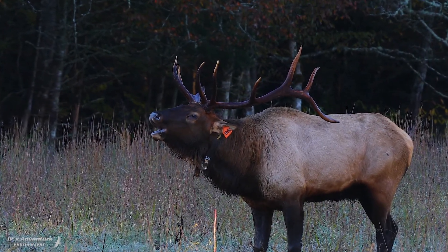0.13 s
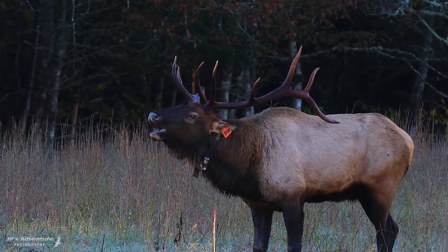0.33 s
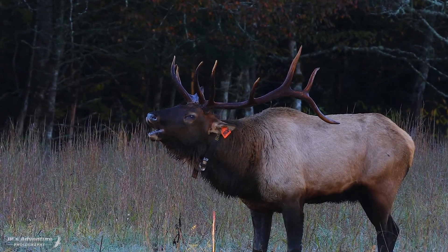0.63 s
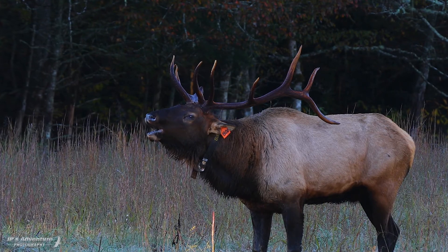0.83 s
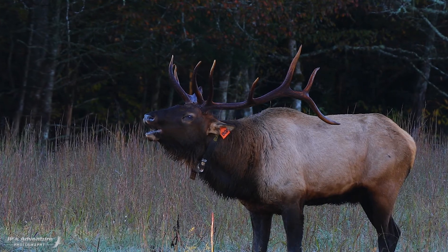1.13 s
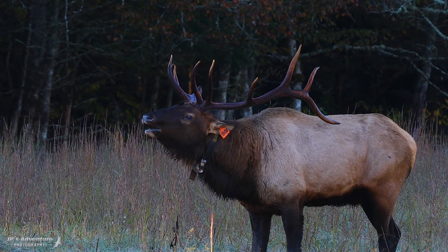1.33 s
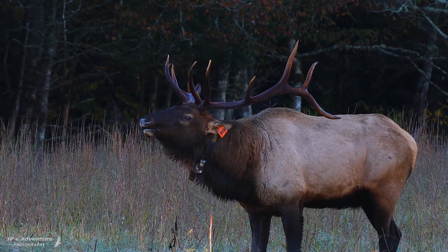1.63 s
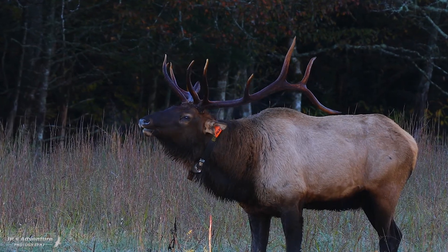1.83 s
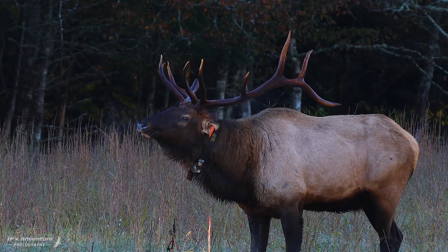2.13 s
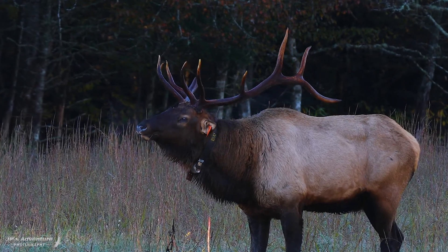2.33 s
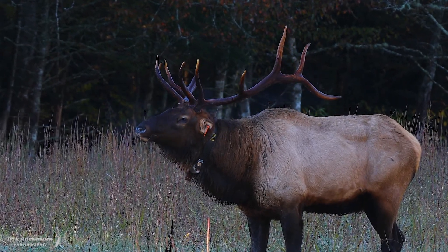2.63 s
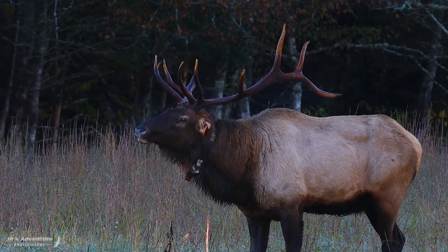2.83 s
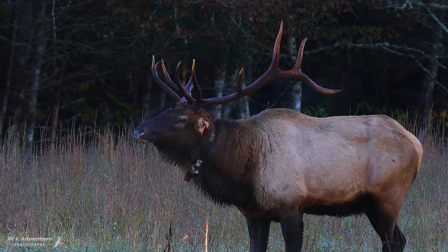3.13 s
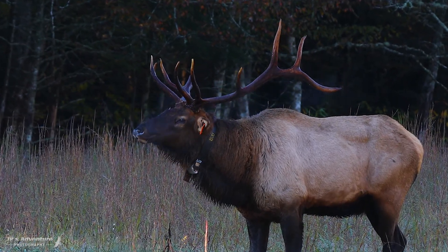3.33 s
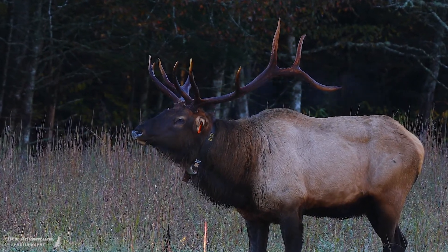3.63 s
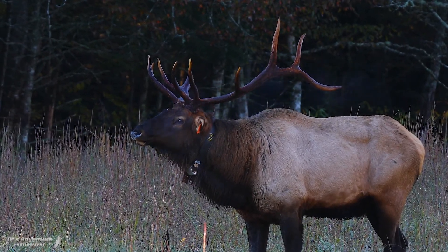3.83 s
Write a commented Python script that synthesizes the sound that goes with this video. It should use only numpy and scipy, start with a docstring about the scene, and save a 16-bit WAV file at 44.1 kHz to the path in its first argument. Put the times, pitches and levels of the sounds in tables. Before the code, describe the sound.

A bull elk's high whistling bugle holds, slides down raspily, and echoes across a meadow.

```python
"""A bull elk's high whistle, already under way, is held over a meadow, then slides down in steps.
A low, rough voice of pulses and rasp sounds with it and chops it into sidebands, deepest in the slide.
The forest edge and far slopes answer with delayed copies and long, dull reverberation.
One microphone also hears a faint, steady rush of filtered noise for outdoor air, and once, far away,
the short trill of a small bird: a thin tone with a fast swing in pitch."""
import sys
import numpy as np
from scipy import signal
from scipy.fft import rfft, irfft, next_fast_len
from scipy.io import wavfile
from scipy.ndimage import map_coordinates

SR = 44100
rng = np.random.default_rng(int(sys.argv[2]) if len(sys.argv) > 2 else 0)


def pcm_store(signal):
    """Save signal as 16-bit PCM."""
    levels = np.round(np.clip(np.atleast_2d(signal), -1, 1) * 32767)
    wavfile.write(sys.argv[1], SR, levels.astype(np.int16).T)


N = 176400
LEAD_S = 1  # seconds computed before the microphone opens

# The low voice. Each row: time in seconds, pitch in Hz, level in dB, roughness from 0 to 1.
VOICE = [(0, 103.8, -49, .65), (.2, 100, -45.5, .8), (.32, 97.98, -48.5, 0.71), (.385, 100, -51.5, .7),
         (.41, 100.1, -65, .7), (.45, 100, -64, .7), (.5, 101.1, -49, 0.6), (.68, 98.96, -50.5, .45),
         (.77, 99.93, -45, .5), (.85, 102.5, -42.5, .05), (.93, 104, -46.5, .25), (1.02, 103.5, -45.5, .2),
         (1.15, 103.9, -45.5, .23), (1.23, 104.7, -49, .2), (1.33, 105.2, -49.5, .2),
         (1.42, 104.7, -52.5, .25), (1.49, 94.2, -60, .1)]
JITTER = 0.0509  # scale of the low voice's pitch scatter at full roughness, as a share of pitch
END_S, RELEASE_S = 1.49, 0.0077  # start and length of the final fade


def elk():
    """Both voices of the bull sound together and stop together."""
    hz, level_db, rough = curves(VOICE)
    rough = np.clip(rough, 0, 1)
    scatter = JITTER * rough ** 2 * wobble(120)
    phase = running_phase(hz * (1 + scatter))
    release = np.clip((END_S - clock()) / RELEASE_S + 1, 0, 1)
    return release * (whistle(phase, rough) + low_voice(phase, level_db, rough))


# The whistle's pitch before its small wavers. Each row: time in seconds, pitch in Hz.
PITCH = [(-.9, 935), (-.2, 962), (-.08, 1041), (.22, 1034), (.3, 1039), (.34, 1047), (0.446, 1051),
         (.5, 1043), (.66, 1039), (.755, 1022), (.78, 960), (.83, 870), (.86, 838), (.92, 808), (.95, 816),
         (1.05, 796), (1.09, 798), (1.16, 760), (1.215, 686), (1.27, 717), (1.31, 679), (1.37, 655),
         (1.43, 555), (1.49, 505)]
# Its partials. Each row: time in seconds, levels of the first, second and third in dB.
PARTIALS = [(0, -25.5, -48.5, -63), (.21, -26, -51.5, -64.5), (.335, -26.5, -48.5, -61.5),
            (.395, -23.5, -44.5, -59.5), (.445, -27, -46.5, -58.5), (.505, -24, -47.5, -59),
            (.6, -27.5, -49.5, -61.5), (.68, -25.5, -48, -60.5), (.735, -28, -50.5, -61),
            (.76, -26, -48.5, -62), (.79, -28, -45.5, -65.5), (.82, -40.5, -35.5, -61.5),
            (.88, -44.5, -44, -59), (.98, -45, -47, -65), (1.11, -44, -48, -57.5),
            (1.175, -42.5, -42.5, -74.5), (1.215, -36.5, -61.5, -73), (1.27, -43, -60, -73.5),
            (1.305, -34.5, -62.5, -85), (1.37, -45.5, -59, -89), (1.425, -41.5, -71.5, -75),
            (1.48, -74.5, -81, -82)]
# Overtones of the held note. Each row: multiple of the pitch, level in dB against the third
# partial at HELD_HZ, dB gained per Hz of pitch.
UPPER = [(4, -18, -0.54), (5, -19.5, .45), (6, -10, 0.08), (7, -35, 0.3)]
HELD_HZ = 1040
UPPER_FROM_HZ, UPPER_SPAN_HZ = 1005, 36  # the overtones fade in above this pitch, over this span
# How deeply the low voice chops the whistle. Each row: time in seconds, depth from 0 to 1.
CHOP = [(0, 0.05), (.32, 0.06), (.4, 0.01), (.45, 0), (.52, 0.07), (.75, .08), (.8, 0.1), (.85, 0.8),
        (.89, 0.7), (.94, .55), (1.02, .48), (1.15, .27), (1.22, 0.11), (1.45, .1)]
WAVER, WAVER_HZ = .007, 69.7  # pitch waver as a share of pitch at full chop depth; knots a second
FLUTTER_DB, FLUTTER_HZ = -21, 410  # irregular shake against the chop depth; knots a second
# Sidebands around each partial. Each row: offset in steps of the low pitch, level in dB.
SIDES = [(-2, -24), (-1, -10), (1, -1.5), (2, -7), (3.5, -15.5)]
# Half steps from uneven cycles of the rough voice. Each row: offset in steps, dB at full roughness.
HALF_SIDES = [(1.5, -11), (2.5, -8.5)]
SPREAD = .7  # phase spread in radians per squared step, softening each chop
# The tense throat's colour on the chopped whistle. Each row: frequency in Hz, gain in dB.
TENSE_SIDEBANDS = [(500, 0), (700, 2), (800, -4.5), (935, 8), (1040, -2), (1140, -5), (1230, 1),
                   (1350, -5.5), (1520, -2.5), (1730, 3), (1970, 9), (2180, 10.5), (2360, 20.5), (2480, 2),
                   (2750, 6), (3020, 22), (3300, 7), (4350, 20), (5400, 17), (6150, 13), (7000, 4.5)]
# The relaxed throat's colour on it. Each row: frequency in Hz, gain in dB.
SLIDE_SIDEBANDS = [(580, 6), (720, -4.5), (850, -4), (940, 6), (1040, 11.5), (1140, -2.5), (1330, -6.5),
                   (1500, -0.5), (1740, -0.5), (1900, -8.5), (2400, -2.5), (2750, -3.5)]


def whistle(voice_phase, rough):
    """A near-pure tone; the low voice modulates it into sidebands, strongest on the upper side."""
    hz, = curves(PITCH)
    depth, = curves(CHOP)
    first, second, third = curves(PARTIALS)
    waver = .001 * wobble(30) + WAVER * depth * wobble(WAVER_HZ)
    phase = running_phase(hz * (1 + waver))
    # complex tones, so that the upper and lower sidebands can differ
    tone = sum(amp(db) * np.exp(1j * k * phase) for k, db in enumerate([first, second, third], 1))
    held = np.clip((hz - UPPER_FROM_HZ) / UPPER_SPAN_HZ, 0, 1)
    strain = np.maximum(hz, UPPER_FROM_HZ) - HELD_HZ
    overtones = sum(
        amp(third + db + slope * strain) * np.exp(1j * round(k) * phase) for k, db, slope in UPPER)
    tone = tone + held * overtones

    def cycles(sides):
        """Sideband tones at whole and half steps of the low voice."""
        return sum(
            amp(db) * np.exp(.5j * round(2 * step) * voice_phase + 1j * SPREAD * step ** 2)
            for step, db in sides)

    flutter = amp(FLUTTER_DB) * wobble(FLUTTER_HZ)
    chopping = cycles(SIDES) + rough * cycles(HALF_SIDES) + flutter
    chopped = (tone * depth * chopping).imag
    coloured = relaxing(shaped(chopped, TENSE_SIDEBANDS), shaped(chopped, SLIDE_SIDEBANDS))
    return np.sqrt(2) * (tone.imag + coloured)


# The folds' pulses are duller than their rasp. Each row: frequency in Hz, gain in dB.
PULSE_TILT = [(200, -5.5), (315, 1), (420, -3), (570, -5), (850, -2.5), (1040, 6.5), (1300, -14.5),
              (1800, 0), (2080, 1.5), (2300, -17.5), (6000, -28)]
# Colour of the rasp in the tense throat. Each row: frequency in Hz, gain in dB.
RASP_TILT = [(160, 4), (320, -1), (600, -1.5), (1200, 3.5), (2300, 5.5), (6000, -8)]
# Change of that colour once the throat relaxes. Each row: frequency in Hz, gain in dB.
RELAXED = [(400, 2), (600, 0.5), (900, 2), (1100, -2.5), (1800, 4.5), (2250, -10.5), (2600, -0.5),
           (3800, 4), (4400, -2), (6000, 2.5)]
RASP_PULSE_DB = 3  # the rasp swells and fades by this much with every cycle of the folds
# The soft low fundamental. Each row: time in seconds, level in dB.
CHEST = [(.6, -87), (.75, -74.5), (.9, -71), (1.44, -75), (1.49, -82)]
# Blooms of the third harmonic. Each row: centre in seconds, length in seconds, peak level in dB.
HOOTS = [(.83, 0.045, -74), (.98, 0.083, -59.5), (1.155, 0.039, -62.5)]


def low_voice(phase, level_db, rough):
    """Vocal fold pulses and rasp ring through the throat, over soft low harmonics."""

    def voiced(source, tilt):
        """A source through the throat, at rms 1."""
        return unit(filtered(source, lambda f: throat(f) * amp(along(tilt, f))))

    clicks = np.diff(np.floor(phase / (2 * np.pi)), prepend=0)  # one per cycle
    pulses = voiced(clicks, PULSE_TILT)
    breath = rng.standard_normal(len(phase)) * amp(RASP_PULSE_DB * np.cos(phase))
    rasp = voiced(breath, RASP_TILT)
    rasp = relaxing(rasp, shaped(rasp, RELAXED))
    chest_db, = curves(CHEST)
    fundamental = amp(chest_db) * np.sin(phase)
    hoots = swells(HOOTS) * np.cos(3 * phase)
    rough_mix = np.sqrt(1 - rough) * pulses + np.sqrt(rough) * rasp
    return amp(level_db) * rough_mix + np.sqrt(2) * (fundamental + hoots)


# Throat resonances. Each row: centre in Hz, width in Hz, gain in dB before the tilt.
THROAT = [(158, 36, -8.5), (323, 21, -7.5), (583, 21, 4.5), (693, 55, 2), (948, 59, 1), (1033.6, 27, 6),
          (1220, 21, -4), (1471.5, 27, 4.5), (1760, 190, -12.5), (2164, 50, -1.5), (2227, 28, -4.5),
          (2360, 22, -2.5), (2760, 30, -20), (4370, 120, -26), (5600, 160, -24.5), (6200, 300, -27)]
# Overall tilt of the throat. Each row: frequency in Hz, gain in dB.
THROAT_TILT = [(60, -12), (150, -3.5), (1250, 3), (1350, 5.5), (1470, 2), (2400, -0.5), (2480, -7.5),
               (2750, -12.5), (3080, -7), (3600, -17), (4350, -1.5), (4850, -20.5), (5500, 2), (5800, -3),
               (6200, -1.5), (6900, -11), (13000, -19)]


def throat(f):
    """Response of the long vocal tract, with dark valleys between its resonances."""
    modes = sum(amp(db) * 1j * f * w / (c * c - f * f + 1j * f * w) for c, w, db in THROAT)
    return modes * amp(along(THROAT_TILT, f))


# Throat change from held note to slide. Each row: time in seconds, relaxed share from 0 to 1.
RELAX = [(.76, 0.04), (.84, 1)]


def relaxing(tense, relaxed):
    """Cross-fade from the tense throat of the held note to the relaxed one of the slide."""
    share = np.clip(curves(RELAX)[0], 0, 1)
    return (1 - share) * tense + share * relaxed


# Soft low swells under the held note. Each row: centre in seconds, length in seconds, peak level in dB.
GROANS = [(0.067, 0.14, -67), (0.314, 0.11, -58)]
GROAN_HZ = 165
# Swells of a lower throat resonance. Each row: centre in seconds, length in seconds, peak level in dB.
GROWLS = [(.2, 0.087, -55), (.85, 0.093, -50), (.96, 0.16, -53), (1.17, 0.056, -58)]
GROWL_HZ, GROWL_WIDTH_HZ = 576, 40  # centre and standard deviation of the bell-shaped band


def groans():
    """Brief swells of a low, wavering tone and of noise in a hoarse throat resonance."""
    t = clock()
    tone = np.sqrt(2) * np.sin(2 * np.pi * GROAN_HZ * t + .5 * wobble(39))
    noise = rng.standard_normal(len(t))
    hoarse = unit(filtered(noise, lambda f: np.exp(-((f - GROWL_HZ) / GROWL_WIDTH_HZ) ** 2 / 2)))
    return swells(GROANS) * tone + swells(GROWLS) * hoarse


# Echoes from tree lines. Each row: delay in seconds, level in dB against the call.
ECHOES = [(.2, -28), (.42, -29.5), (.725, -29), (1.398, -42), (2.0, -51.5)]
# Reverberation of the near trees. Each row: frequency in Hz, time to fall 60 dB in seconds.
FOREST = [(150, 3.6), (700, 1.4), (1100, 2.2), (2500, 1.7), (7000, 0.58)]
# Reverberation of the far slopes. Each row: frequency in Hz, time to fall 60 dB in seconds.
HILLS = [(150, 4.6), (700, 5.8), (1100, 4.7), (2500, 4.1), (7000, 1.2)]
FOREST_DB, HILLS_DB = -22, -28.5
# Colour of the way to the trees and back, losing treble. Each row: frequency in Hz, gain in dB.
DISTANT = [(1100, -0.5), (1800, -4), (2500, 4.5), (6000, -12.5)]


def meadow(call):
    """Dull echoes and reverberation return from the woods around the field."""
    t = clock()
    echoes = sum(amp(db) * np.interp(t - delay, t, call, left=0) for delay, db in ECHOES)
    forest = amp(FOREST_DB) * tail(call, FOREST)
    hills = amp(HILLS_DB) * tail(call, HILLS)
    return shaped(echoes + forest + hills, DISTANT)


def tail(x, t60s):
    """Diffuse reverberation from decaying noise; each frequency dies at its own speed."""
    hz, t, z = signal.stft(rng.standard_normal(3 * SR), SR, nperseg=256)
    decay = amp(-60 * t / along(t60s, hz)[:, None])
    build_up = 1 - np.exp(-t / 0.047)  # time constant in seconds
    ir = signal.istft(z * decay * build_up, SR, nperseg=256)[1]
    return signal.fftconvolve(x, ir / np.linalg.norm(ir))[:len(x)]


BIRD_S, BIRD_LENGTH_S, BIRD_DB = 3.47, 0.27, -80  # start, length, mean peak level
BIRD_HZ, BIRD_SWING_HZ, TRILL_RATE = 7700, 280, 30  # starting centre, swing each way, swings a second
BIRD_SAG_HZ_PER_S = 1000
BIRD_ECHO_S, BIRD_ECHO_DB = .052, -6  # a reflection blurs the trill


def bird():
    """A thin, high trill: a tone swinging fast in pitch, sagging a little, with one reflection."""
    t = clock() - BIRD_S
    sag = BIRD_SAG_HZ_PER_S * np.clip(t, 0, 1)
    swing = BIRD_SWING_HZ * np.cos(2 * np.pi * TRILL_RATE * (t - .015))
    hz = BIRD_HZ - sag + swing + 50 * wobble(500)
    swell = np.sqrt(np.abs(np.sin(np.pi * np.clip(t / BIRD_LENGTH_S, 0, 1))))
    trill = amp(BIRD_DB + 3.3 * wobble(54)) * swell * np.sin(running_phase(hz))
    return trill + amp(BIRD_ECHO_DB) * np.interp(clock() - BIRD_ECHO_S, clock(), trill)


# Spectrum of the outdoor air. Each row: frequency in Hz, relative density in dB per Hz.
AIR = [(25, -16), (70, -7.5), (160, -5), (320, -2), (700, 1.5), (1100, -0.5), (2000, -5), (2600, -11),
       (3300, -19), (4200, -23.5), (5200, -29.5), (7000, -27.5), (8600, -33), (10500, -25), (13500, -26.5),
       (15600, -27)]
AIR_DB = -64


def air():
    """Steady distant rush with a trace of hiss, made of filtered noise."""
    noise = shaped(rng.standard_normal(len(clock())), AIR)
    return amp(AIR_DB + 0.14 * wobble(5.9)) * unit(noise)


def amp(db):
    """Decibels to gain."""
    return 10 ** (np.asarray(db) / 20)


def unit(x):
    """Scale to rms 1."""
    return x / np.sqrt(np.mean(x ** 2) + 1e-20)


def clock():
    """Sample times in seconds, starting early because the call is already under way."""
    return np.arange(-LEAD_S * SR, N) / SR


def running_phase(hz):
    """Phase in radians of a tone whose pitch moves."""
    return 2 * np.pi * np.cumsum(hz) / SR


def along(points, hz):
    """Read (Hz, value) points on a log frequency axis."""
    f, v = np.transpose(points)
    return np.interp(np.log(hz + 1), np.log(f + 1), v)


def curves(rows):
    """One value per sample for each column after the time."""
    s, *cols = np.transpose(rows)
    return [np.interp(clock(), s, c) for c in cols]


def swells(rows):
    """Sum of bell-shaped gains, one for each row."""
    return sum(amp(db) * np.exp(-(2 * (clock() - s) / length) ** 2) for s, length, db in rows)


def wobble(rate):
    """A smooth random curve, rate knots a second."""
    at = np.arange(len(clock())) * rate / SR
    return map_coordinates(rng.standard_normal(8192), [at], mode="wrap")


def filtered(x, response):
    """Apply a complex response of frequency, padded so that ringing does not wrap round."""
    m = next_fast_len(len(x) + SR // 2)
    return irfft(rfft(x, m) * response(np.fft.rfftfreq(m, 1 / SR)), m)[:len(x)]


def shaped(x, points):
    """Colour a sound by (Hz, dB) points."""
    return filtered(x, lambda f: amp(along(points, f)))


def scene():
    """The elk, its echoes, the small bird and the quiet field at one microphone."""
    call = elk() + groans()
    return (call + meadow(call) + bird() + air())[None, -N:]


TOP_HZ = 15720


def record(dry):
    """The recorder keeps nothing above its band limit."""
    return np.array([filtered(x, lambda f: f < TOP_HZ) for x in dry])


dry = scene()
out = record(dry)
pcm_store(out)
```